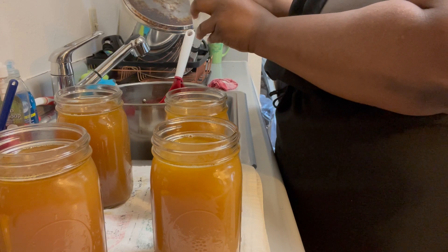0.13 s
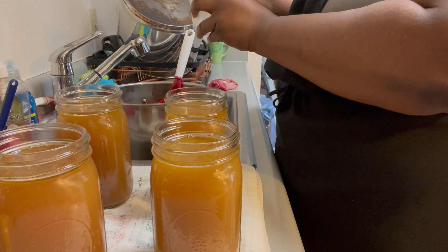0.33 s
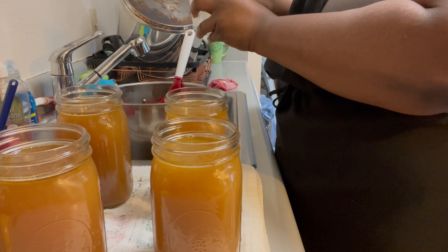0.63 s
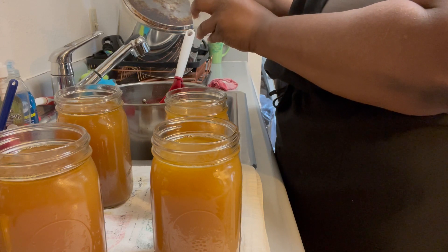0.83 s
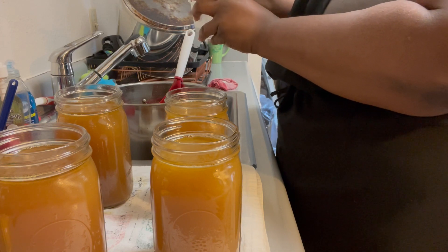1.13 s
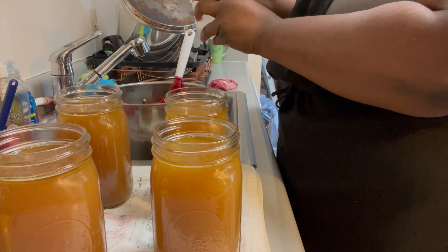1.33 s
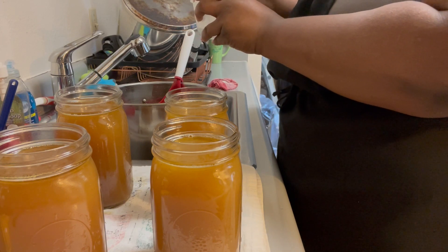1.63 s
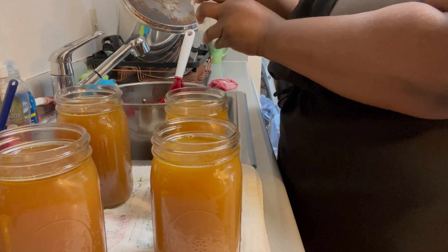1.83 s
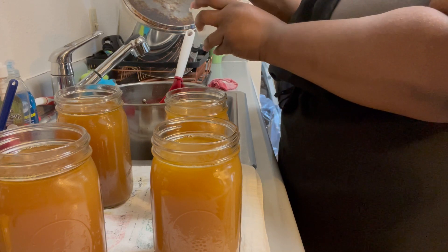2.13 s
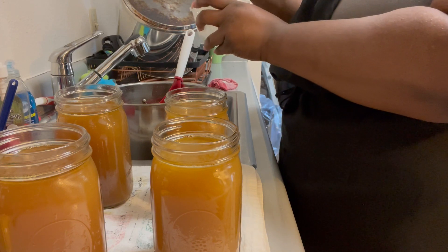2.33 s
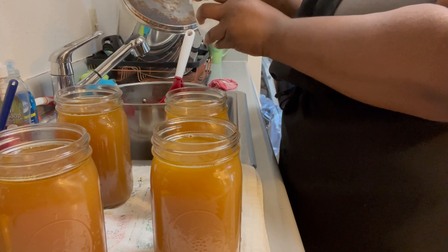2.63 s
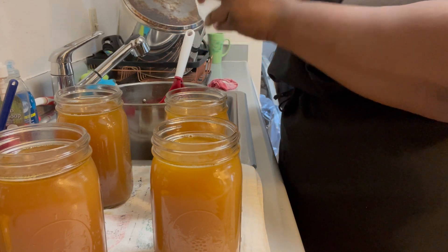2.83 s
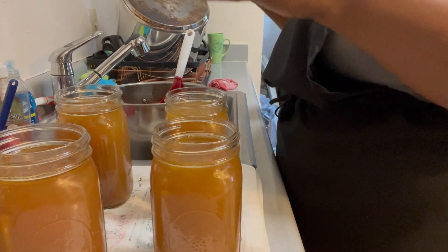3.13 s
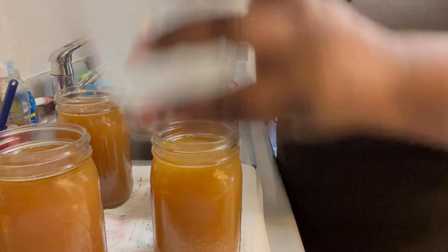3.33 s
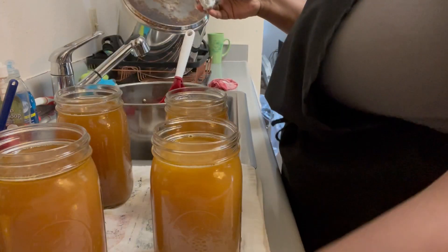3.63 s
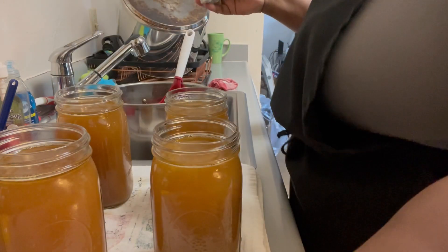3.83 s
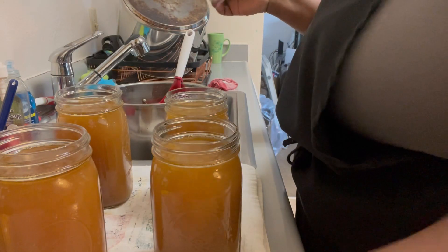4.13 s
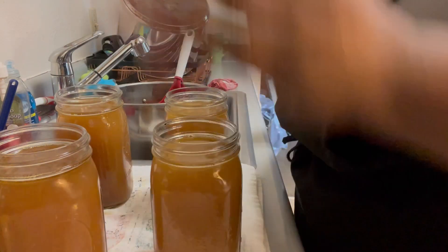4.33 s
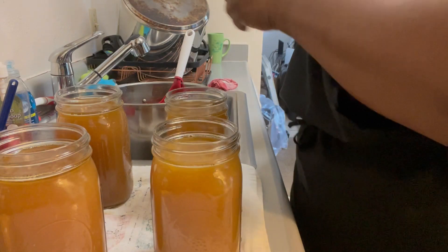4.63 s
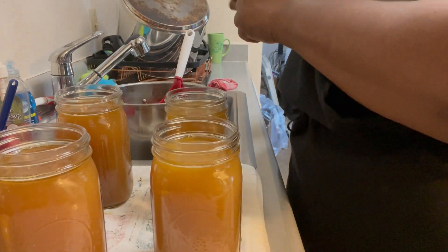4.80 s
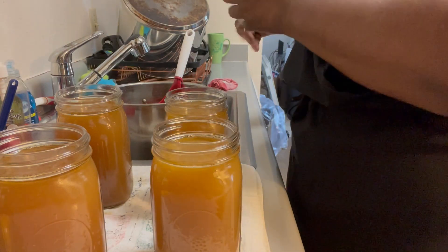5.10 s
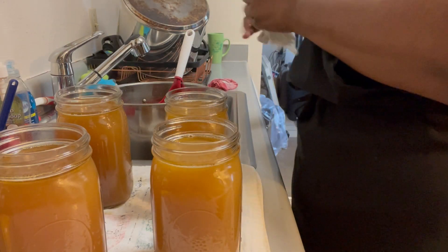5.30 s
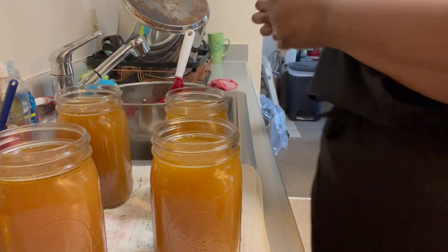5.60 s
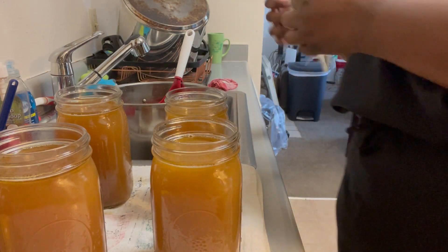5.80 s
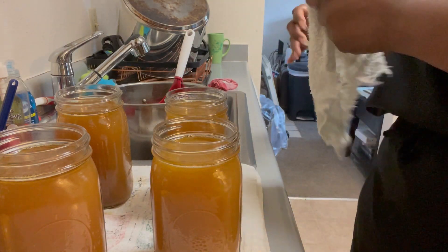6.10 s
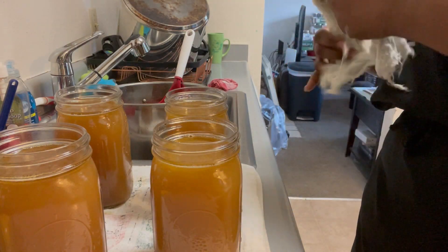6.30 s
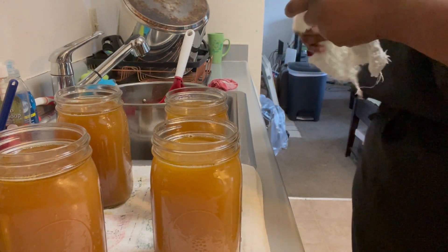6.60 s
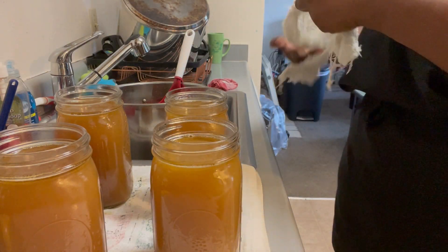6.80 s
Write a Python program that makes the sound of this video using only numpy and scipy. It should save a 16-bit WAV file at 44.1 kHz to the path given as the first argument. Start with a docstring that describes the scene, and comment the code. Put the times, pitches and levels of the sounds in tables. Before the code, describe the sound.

Wet cloth squeezed with small crackling pops and fizz, then a plastic jug knocks down on a counter and rocks to rest.

```python
"""In a small kitchen, a wet straining cloth is wrung out over jars of juice: films snap, bubbles ring and fizz.
A plastic jug is put down on the counter: its edge knocks, it lands flat with a thump, then rocks to and fro.
The cloth is shaken out while steps make the floor boom; room rumble and an appliance drone lie under everything.
Jug, booms and bubbles are sums of decaying sines; cloth, fizz and clicks are coloured noise under envelopes."""
import sys
import numpy as np
from scipy import signal
from scipy.io import wavfile

SR = 44100
rng = np.random.default_rng(int(sys.argv[2]) if len(sys.argv) > 2 else 0)


def log_audio(samples):
    """Write samples as a 16-bit WAV file to the path given in sys.argv[1]."""
    # one column per channel
    frames = np.atleast_2d(samples).T
    # limit to full scale, then quantise
    limited = np.clip(frames, -1, 1)
    pcm = np.round(limited * 32767).astype(np.int16)
    wavfile.write(sys.argv[1], SR, pcm)


N = 306495


def from_db(db):
    """Level law: decibels to amplitude gain."""
    return 10 ** (np.asarray(db) / 20)


def rms_one(x):
    """Power normalisation: scale to unit root mean square."""
    return x / np.sqrt(np.mean(x ** 2) + 1e-20)


def in_time(points):
    """Linear interpolation of a curve in time, read at every sample."""
    seconds, values = np.transpose(points)
    return np.interp(np.arange(N) / SR, seconds, values)


def at_hz(points, hz):
    """Linear interpolation on a logarithmic frequency axis."""
    table_hz, values = np.transpose(points)
    return np.interp(np.log(hz), np.log(table_hz), values)


def panned(pan_db):
    """Intensity stereo: left and right gains that differ by pan_db, positive to the left."""
    return from_db(np.array([[.5], [-.5]]) * pan_db)


def add(out, s, sound):
    """Superposition: mix a sound in at time s."""
    start = round(s * SR)
    out[:, start:start + sound.shape[-1]] += sound[..., :N - start]


def drift(rate_hz):
    """Lowpass random process: two equal poles leave a slow wander of unit spread."""
    step = 40   # samples between computed points
    pole = np.exp(-2 * np.pi * rate_hz * step / SR)
    settle = 2000   # points discarded while the filter settles
    raw = rng.standard_normal(N // step + settle + 2)
    slow = signal.lfilter([1], [1, -2 * pole, pole * pole], raw)[settle:]
    return np.interp(np.arange(N) / step, np.arange(len(slow)), rms_one(slow))


def dying(t, t60):
    """Exponential decay: the level falls 60 dB in t60 seconds."""
    return np.exp(-np.log(1000) * t / t60)


def bursts(times, levels_db, t60):
    """Impulsive excitation: the envelope jumps at each contact and decays exponentially."""
    kicks = np.zeros(N)
    kicks[np.round(times * SR).astype(int)] = from_db(levels_db)
    return signal.lfilter([1], [1, -dying(1 / SR, t60)], kicks + 1e-18)


def swelling(start, attack, hold, t60):
    """Build-up and decay: a squared rise, a steady hold and an exponential fall."""
    t = np.arange(N) / SR - start
    rise = np.clip(t / attack, 0, 1) ** 2
    return rise * dying(np.clip(t - attack - hold, 0, 1), t60)


# Likeness of the left and right noise. Each row: frequency in Hz, left-right correlation from -1 to 1.
LIKENESS = [(60, 1), (130, 0.75), (290, -0.14), (640, -0.25), (3000, -0.093), (15000, -0.098)]


def noise_bands(size, low_hz=0, high_hz=SR):
    """Diffuse-field correlation: half-octave noise bands, alike in the bass; yields (Hz, band)."""
    edges = 20 * 2 ** (np.arange(21) / 2)
    white = rng.standard_normal((2, 2, size + SR // 4))   # the extra quarter second lets the filters settle
    for k, (low, high) in enumerate(zip(edges, edges[1:])):
        hz = np.sqrt(low * high)
        if low_hz < hz < high_hz:
            sos = signal.butter(2, [low, high], "band", fs=SR, output="sos")
            # neighbouring bands take different noise
            mid, side = signal.sosfilt(sos, white[k % 2])[:, -size:]
            alike = at_hz(LIKENESS, hz)
            yield hz, np.sqrt(1 + alike) * mid + np.sqrt(1 - alike) * side * [[1], [-1]]


def noise(spectrum):
    """Spectral shaping: weighted bands give stereo noise of one colour, confined to its range; rms 1."""
    bands = noise_bands(N, spectrum[0][0] / np.sqrt(2), spectrum[-1][0] * np.sqrt(2))
    return rms_one(sum(from_db(at_hz(spectrum, hz)) * band for hz, band in bands))


# Reverberation of the room. Each row: frequency in Hz, decay time T60 in seconds.
ROOM_T60 = [(100, 0.43), (300, 0.47), (1000, 0.29), (4000, 0.15), (14000, 0.21)]


def kitchen(x, early_db, late_db, early_t60):
    """Room response: direct sound, quick reflections from jars, sink and wall, then the room's tail."""
    t = np.arange(SR * 3 // 4) / SR
    bands = list(noise_bands(len(t)))
    early = sum(band for hz, band in bands) * dying(t, early_t60) * (t > .002)
    late = sum(band * dying(t, at_hz(ROOM_T60, hz)) for hz, band in bands) * (t > .012)
    echo = from_db(early_db) * rms_one(early) + from_db(late_db) * rms_one(late)
    return x + signal.fftconvolve(x, echo / np.sqrt(len(t)), axes=1)[:, :N]


# Colour of the room rumble. Each row: frequency in Hz, relative level in dB.
RUMBLE = [(20, -7), (45, 1.5), (62, -1), (90, 1), (160, -9.5), (300, -8), (430, -21.5), (700, -20.5),
          (1200, -32), (2000, -41), (4000, -47.5), (8000, -56), (12000, -52.5), (16000, -62)]
# Partials of the appliance drone. Each row: frequency in Hz, level in dB before it wavers.
HUM = [(56, -58.5), (99, -66.5), (148, -67), (199, -72.5), (222, -67), (268, -68), (297, -70), (369, -74.5)]


def background(rumble_db=-54.5, waver=0.65):
    """Steady broadband noise plus narrow-band tones: low rumble under a randomly modulated drone."""
    t = np.arange(N) / SR
    drone = np.zeros(N)
    for hz, db in HUM:
        # the complex drift wavers both strength and phase
        modulation = 1 + waver * (drift(4.8) + 1j * drift(4))
        drone += from_db(db) * np.real(modulation * np.exp(2j * np.pi * hz * t))
    return from_db(rumble_db) * noise(RUMBLE) + drone


# Dull thuds through the counter, and one low thud of the floor (the last row).
# Each row: start in seconds, peak level in dB, pitch in Hz, swell in seconds.
THUDS = [(3.489, -36, 106, 0.0087), (3.844, -28.5, 108, 0.011), (4.04, -17.5, 75, 0.0075),
         (4.071, -23, 61, 0.012), (4.177, -40, 100, 0.025), (5.108, -38, 102, 0.013),
         (5.826, -39.5, 55.4, 0.0095), (5.88, -36.5, 82, 0.0058), (6.363, -39, 41.4, 0.029)]
# Steps that set the floor booming. Each row: start in seconds, peak level in dB.
STEPS = [(0.16, -44.5), (0.811, -49), (6.275, -36.5), (6.433, -31), (6.641, -38)]


def thuds(floor_hz=62.23, floor_swell_s=0.052):
    """Heavily damped resonance: weight on counter or floor makes a low tone swell and die."""
    t, out = np.arange(SR) / SR, np.zeros((2, N))
    floor = [(s, db, floor_hz, floor_swell_s) for s, db in STEPS]
    for s, level_db, hz, swell in THUDS + floor:
        envelope = t / swell * np.exp(1 - t / swell)   # reaches 1 at t = swell
        add(out, s, from_db(level_db) * envelope * np.sin(2 * np.pi * hz * t))
    return out


# Cloth and apron against arm and counter edge. Each row: start in seconds, level in dB, hold in seconds,
# lower band edge in Hz, upper band edge in Hz.
SCUFFS = [(0.029, -70.5, 0.01, 600, 2400), (3.442, -77.5, 0.11, 3530, 6200),
          (3.522, -73, 0.014, 3460, 12000), (5.666, -66, 0.025, 594, 1930), (5.753, -62, 0.035, 600, 2720)]


def scuffs(attack_s=0.015, t60_s=0.19, grain_db=1.5):
    """Stick-slip friction: taut fabric catches and slips in quick grains of band-limited noise."""
    out = np.zeros((2, N))
    for s, db, hold, low_hz, top_hz in SCUFFS:
        band = signal.butter(3, [low_hz, top_hz], "band", fs=SR, output="sos")
        grains = rng.standard_normal((2, N)) * from_db(grain_db * drift(200))
        slips = rms_one(signal.sosfilt(band, grains))
        out += from_db(db) * swelling(s, attack_s, hold, t60_s) * slips
    return out


# Level of a faint, airy, restless noise. Each row: time in seconds, soft-part level in dB about which it swings.
AIRY_NOISE = [(0, -82.5), (.3, -70.5), (.4, -79), (.6, -72), (1.3, -80), (2.1, -79.5), (2.7, -72),
              (3.1, -79), (3.7, -73.5), (4.35, -76.5), (4.65, -67), (5.4, -76), (6.3, -72), (6.95, -83)]
# Strokes of cloth, apron and sliding jug. Each row: start in seconds, length in seconds,
# soft-rub peak in dB, crisp-rub peak in dB.
STROKES = [(0.0, 0.14, -61.5, -82), (3.188, 0.16, -66.5, -102), (3.856, 0.16, -57, -60),
           (3.952, 0.069, -46.5, -60), (4.037, 0.17, -64.5, -72), (4.146, 0.19, -60.5, -72.5),
           (4.41, 0.13, -62.5, -81.5), (4.7, 0.28, -82, -92), (5.087, 0.13, -71, -67.5),
           (5.396, 0.15, -75, -102), (5.734, 0.095, -62, -82), (5.971, 0.25, -63.5, -63.5),
           (6.358, 0.16, -71, -73.5), (6.5, 0.86, -95.5, -92)]
# Colours of the soft and the crisp part. Each row: frequency in Hz, relative level in dB.
RUB_SOFT = [(350, 8), (700, 7.5), (1200, 0), (2200, -7.5), (3500, -9.5), (6000, -45)]
RUB_CRISP = [(1500, 2), (3500, 2.5), (7000, -3.5), (9000, -13), (12000, -6), (14000, -24.5), (16000, -21)]


def rubbing(crisp_db=-8.5, swing_db=2.5, swing_hz=6.3, grain_db=1.72):
    """Amplitude-modulated noise: friction strokes swell over a faint, airy, restless noise, all grainy."""
    airy_db = in_time(AIRY_NOISE) + swing_db * drift(swing_hz)
    strength = from_db(airy_db + np.array([[0], [crisp_db]]))   # rows: soft, crisp
    for start, length, soft_peak_db, crisp_peak_db in STROKES:
        swell = np.sin(np.linspace(0, np.pi, round(length * SR)))
        add(strength, start, from_db([[soft_peak_db], [crisp_peak_db]]) * swell)
    smooth = strength[0] * noise(RUB_SOFT) + strength[1] * noise(RUB_CRISP)
    # in the strokes, fibres catch and slip
    grainy = smooth * from_db(grain_db * drift(90))
    return kitchen(grainy, early_db=-17.0, late_db=-8.5, early_t60=0.098)


# Squeezes that send juice through the cloth. Each row: start in seconds, level in dB, hold in seconds.
SQUEEZES = [(-.03, -75, 0.027), (0.528, -69.5, 0.015), (0.757, -78, 0.11), (1.371, -75, 0.007),
            (1.688, -64.5, 0.059), (1.959, -70.5, 0.0033)]
# Colour of the fizz. Each row: frequency in Hz, relative level in dB.
FIZZ_COLOUR = [(1500, -2.5), (3000, -5.5), (6500, 0.5), (9000, -0.5), (11500, 4), (13300, -6), (16000, 2.5)]


def fizz(attack_s=0.011, t60_s=0.26, grain_db=7.5):
    """Flow noise: tiny bubbles forced through the weave in clumps, as each squeeze builds, holds and dies."""
    flow = sum(from_db(db) * swelling(s, attack_s, hold, t60_s) for s, db, hold in SQUEEZES)
    spray = rms_one(noise(FIZZ_COLOUR) * from_db(grain_db * drift(380)))
    return kitchen(flow * spray, early_db=7.5, late_db=-9, early_t60=0.1)


# Grip on the cloth. Each row: time in seconds, grip from 0 to 1.
WRINGING = [(.3, 0.6), (.5, 0.8), (1.4, 0.84), (1.7, 0)]


def while_wringing(per_s):
    """Random point process: moments come more often the tighter the grip, per_s being the rate at grip 1."""
    return np.flatnonzero(rng.random(N) < in_time(WRINGING) * per_s / SR) / SR


# Colour of a snapping film, also used by tearing(). Each row: frequency in Hz, relative level in dB.
POP_CLICK = [(500, -1), (1000, 1.5), (2000, -0.5), (3500, -1.5), (6000, -11.5), (9000, -19), (12000, -29),
             (16000, -18)]


def crackle(per_s=40, level_db=-66, spread_db=0.5):
    """Random impulse noise: while the cloth is wrung, many faint films snap."""
    times = while_wringing(per_s)
    snaps = bursts(times, rng.normal(level_db, spread_db, len(times)), t60=0.0039) * noise(POP_CLICK)
    return kitchen(snaps, early_db=-5, late_db=-20, early_t60=0.035)


def tearing(times, click_db, after_db=-4, fade_db=9, tear_s=0.029, t60=0.0058, count=6):
    """Successive rupture: a film tears in one sharp snap and an uneven run of ticks, the later the weaker."""
    lateness = rng.random((len(times), count))
    tick_times = times[:, None] + tear_s * lateness
    tick_db = click_db[:, None] + after_db - fade_db * lateness
    ticks = bursts(tick_times.ravel(), tick_db.ravel(), t60)
    return (bursts(times, click_db, t60) + ticks) * noise(POP_CLICK)


def bubble(t, hz, t60, swell_s=0.00041, rise_per_s=1.0):
    """Damped cavity resonance: one bubble rings, its pitch rising by the fraction rise_per_s each second."""
    phase = 2 * np.pi * hz * t * (1 + rise_per_s * t / 2)
    return np.sin(phase) * (1 - np.exp(-t / swell_s)) * dying(t, t60)


def small_pops(per_s=12, click_db=-69, bubble_db=-72, hollow_hz=1090):
    """Random bubble entrainment: faint high bubbles, as rows laid out like POPS."""
    times = while_wringing(per_s)
    pitches = np.exp(rng.uniform(*np.log((2500, 8900)), len(times)))   # Hz, even in log pitch
    return [(s, click_db, click_db, hollow_hz, bubble_db, hz) for s, hz in zip(times, pitches)]


# Distinct wet pops, and the small bright tap of the opening knock (the first row); levels before the trims
# in pops(). Each row: start in seconds, click level in dB, hollow level in dB, hollow pitch in Hz,
# bubble (or tap) level in dB, bubble (or tap) pitch in Hz.
POPS = [(.037, -80, -58, 1150, -49, 1980), (.292, -71, -71, 1090, -64, 5040),
        (.377, -74, -74, 1100, -59.5, 5700), (.439, -49.5, -56.5, 1600, -45.5, 2710),
        (.484, -57, -70, 1100, -59.5, 8200), (.5197, -48.5, -53, 1000, -48, 2530),
        (.547, -65, -55, 1110, -52, 11900), (.5725, -52.5, -53, 1120, -50.5, 2330),
        (.592, -57, -54, 1120, -60, 2850), (.613, -55, -58, 1300, -51.5, 4100),
        (.649, -53, -47, 1060, -52, 3200), (.7243, -51, -50, 1590, -44, 2320),
        (.7728, -44, -57, 1490, -38.5, 11720), (.897, -70, -70, 1100, -59, 3300),
        (.957, -69, -61, 1110, -64.5, 6520), (.976, -59, -56, 990, -64, 2100),
        (1.05, -77, -74, 1103, -60, 3240), (1.11, -77, -80, 1100, -64, 8350),
        (1.198, -68, -60, 1180, -61, 2220), (1.229, -54.5, -63, 1100, -52.5, 4200),
        (1.2885, -53, -48.5, 1000, -48.5, 3660), (1.346, -56, -54, 1010, -46.5, 3940),
        (1.387, -64, -73, 1000, -49, 6480), (1.571, -73, -69, 1017, -61, 4860),
        (1.6385, -57, -50, 1040, -52.5, 3020), (1.648, -75, -69, 1010, -61, 7400),
        (1.981, -57, -66, 990, -54.5, 2850), (6.449, -53, -45, 890, -52, 1330)]
# Hollow under the cloth. Each row: multiple of its pitch, decay time T60 in seconds, relative level in dB.
POP_BODY = [(1, 0.015, 2.5), (1.4, 0.011, -7.5), (2.5, 0.01, -10)]


def pops(ring_t60=0.012, hollow_trim_db=-1, first_db=-3, later_db=-8.0, later_s=0.02, pitch_spread=0.13):
    """Impulse-excited cavities: a film snaps, the hollow below answers, a bubble and its neighbours ring."""
    pan_db, spread_db = -1.0, 6.5   # left-right mean and scatter
    rows = POPS + small_pops()
    times, click_db = np.transpose(rows)[:2]
    t = np.arange(SR // 10) / SR
    out = tearing(times, click_db)
    for s, _, hollow_db, hollow_hz, bubble_db, hz in rows:
        hollow = np.zeros(len(t))
        for k, (ratio, t60, db) in enumerate(POP_BODY):
            hollow += (-1) ** k * from_db(db) * bubble(t, hollow_hz * ratio, t60)
        first = from_db(bubble_db + first_db) * bubble(t, hz, ring_t60)
        place = panned(rng.normal(pan_db, spread_db))
        add(out, s, place * (from_db(hollow_db + hollow_trim_db) * hollow + first))
        # eight neighbours follow at random delays, pitches and sides
        for delay, detune, side in rng.uniform((0, -1, -1), (1, 1, 1), size=(8, 3)):
            neighbour = from_db(bubble_db + later_db) * bubble(t, hz * (1 + pitch_spread * detune), ring_t60)
            add(out, s + later_s * delay, panned(spread_db * side) * neighbour)
    return kitchen(out, early_db=-3.5, late_db=-17, early_t60=0.16)


# The jug is bumped, knocks on its edge, bounces, then chatters down flat. Each row: time in seconds,
# body force in dB, wall force in dB, tick force in dB, contact from 0 (flat base) to 1 (edge).
KNOCKS = [(.039, -53, -42, -82, 0.25), (3.494, -39.5, -56, -95, 0.62), (3.52, -48.5, -60, -92, 0.52),
          (3.8415, -13.5, -12.5, -25, 0.83), (3.8635, -30, -18.5, -41.5, 0.8), (3.96, -37, -59, -74, 0.027),
          (3.9928, -34, -17.5, -37.5, 0), (4.0025, -47, -22.5, -36.5, 0.095),
          (4.013, -29, -25.5, -45.5, 0.13), (4.0245, -31.5, -32.5, -62, 0), (4.064, -34.5, -39, -66, 0.28)]
# It rocks from side to side with uneven rebounds. Each row: time in seconds, body force in dB, wall force in dB.
ROCKS = [(4.2434, -33.5, -38.5), (4.279, -36, -44), (4.473, -39.5, -42.5), (4.507, -43, -50),
         (4.5383, -43, -46.5), (4.568, -46, -53), (4.639, -35, -44), (4.679, -44, -44.5),
         (4.7, -42.5, -48.5), (4.733, -46.5, -59), (4.8901, -38.5, -43), (4.929, -45, -51.5),
         (5.033, -41.5, -47.5), (5.055, -40.5, -44.5), (5.075, -47, -51), (5.202, -46.5, -67),
         (5.3202, -41.5, -48.5), (5.424, -47, -57), (5.438, -43.5, -52), (5.458, -42, -48),
         (5.495, -45, -55), (5.633, -48, -59), (5.766, -48, -54), (5.83, -41.5, -47), (5.877, -42.5, -53),
         (5.923, -45, -58.5)]


def contacts(rock_tick_db=-21.5, rock_edge=0.29):
    """Impact sequence: every touch of the jug in the columns of KNOCKS, rocking ticks set below the wall."""
    return KNOCKS + [(s, body, wall, wall + rock_tick_db, rock_edge) for s, body, wall in ROCKS]


# Modes of jug and counter top. Each row: nominal frequency in Hz, decay time T60 in seconds,
# relative level in dB struck on the edge, relative level in dB struck flat, left-right difference in dB.
JUG = [(157, 0.14, -10, -13.5, 4), (228.5, 0.21, -11, -5.5, 6), (276.6, 0.28, -15, -4.5, 1),
       (303.2, 0.11, -2.5, 5.5, -5.5), (337, 0.13, -6, -22, -8.5), (375.6, 0.14, -16, -23, -9.5),
       (497, 0.067, -13, -14.5, 5), (591.5, 0.038, -16.5, -5, -12), (682.7, 0.06, -18.5, -4.5, 2.5),
       (802, 0.028, 5, -11.5, 5.5), (920, 0.03, -6, -21, 1), (1004, 0.034, 5, -14.5, -0.5),
       (1110, 0.056, -4.5, -15, 6), (1249, 0.075, -19, -10.5, -1), (1393, 0.07, -20.5, -23, 2.5),
       (1658, 0.044, -12.5, -19, 3), (2092, 0.02, -14.5, -19, 1), (2624, 0.019, -1, -3, 8.5),
       (3250, .025, -20.5, -9.5, 1.5), (3660, 0.019, -13, -4.5, -2), (4700, 0.015, -21, -11, 0),
       (5210, 0.014, -12.5, -23, -7.5), (7100, 0.0091, -7.5, -18.5, -3), (7670, 0.014, -18, -19.5, 3)]
# Colour of the contact noise. Each row: frequency in Hz, relative level in dB.
CRACK = [(300, -1.5), (1200, 8), (2000, -0.5), (3500, 0.5), (7500, -6), (9500, -21.5), (12000, -11),
         (16000, -30.5)]


def jug(grind_db=-15.0, grind_t60=0.1, edge_grind_db=-9, crack_db=-2.5, flat_crack_db=-1,
        swell_cycles=1.0, scatter_db=3.2, pitch_scatter=0.035):
    """Modal synthesis: contacts ring one set of modes, weighted by striking point and force spectrum."""
    times, body_db, wall_db, tick_db, edge = np.transpose(contacts())
    hz, t60, edge_db, flat_db, pan_db = np.transpose(JUG)
    t, out = np.arange(SR // 2) / SR, np.zeros((2, N))
    signs = (-1) ** np.arange(len(hz))[:, None]
    swell = 1 - np.exp(-np.outer(hz, t) / swell_cycles)   # the heavy low modes take longest to get going
    for s, body, wall, tick, share in zip(times, body_db, wall_db, tick_db, edge):
        force_db = at_hz([(400, body), (600, wall), (1300, wall), (2600, tick)], hz)
        # the wide base touches at a different spot each time, which shifts pitch and strength of the modes
        detune, uneven = (1 - share) * rng.uniform(-1, 1, (2, len(hz)))
        struck_hz = hz * (1 + pitch_scatter * detune)
        rings = signs * np.sin(2 * np.pi * np.outer(struck_hz, t)) * dying(t, t60[:, None])
        point_db = share * edge_db + (1 - share) * flat_db
        strength = from_db(force_db + point_db + scatter_db * uneven)
        add(out, s, (panned(pan_db) * strength) @ (swell * rings))
    crack_envelope = bursts(times, tick_db + (1 - edge) * flat_crack_db, t60=0.016)
    crack = from_db(crack_db) * crack_envelope * noise(CRACK)
    # the plastic slides a little at each touch, on its base more than on its edge
    grind_envelope = bursts(times, wall_db + edge * edge_grind_db, grind_t60)
    grind_colour = [(200, -6.0), (400, 8.0), (650, -1), (1300, -8.0), (2000, -16.0), (2800, -20.5)]   # (Hz, dB)
    grind = from_db(grind_db) * grind_envelope * noise(grind_colour)
    return kitchen(out + crack + grind, early_db=-8.0, late_db=-16.0, early_t60=0.089)


def scene():
    """Superposition of all sources, leaning slightly to the right."""
    booms = kitchen(thuds(), early_db=-13.5, late_db=-11.5, early_t60=0.38)
    friction = rubbing() + scuffs()
    wet = fizz() + crackle() + pops()
    return (background() + booms + friction + wet + jug()) * panned(pan_db=-1.5)


def record(dry):
    """Lowpass filtering: the microphone dulls the highest treble, and the top is cut steeply."""
    dulled = signal.sosfilt(signal.butter(4, 13500, fs=SR, output="sos"), dry)
    # order 14, at least 60 dB down from 16800 Hz
    return signal.sosfilt(signal.cheby2(14, 60, 16800, fs=SR, output="sos"), dulled)


dry = scene()
out = record(dry)
log_audio(out)
```